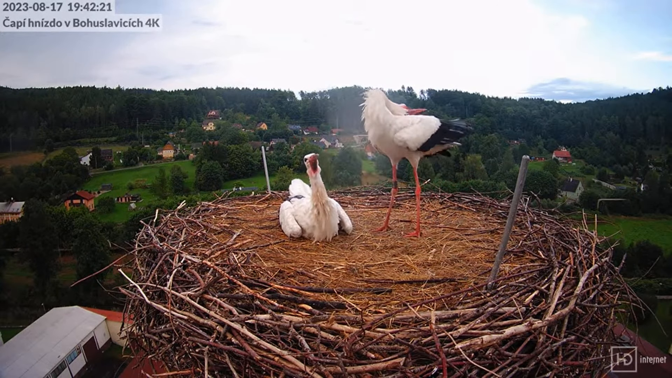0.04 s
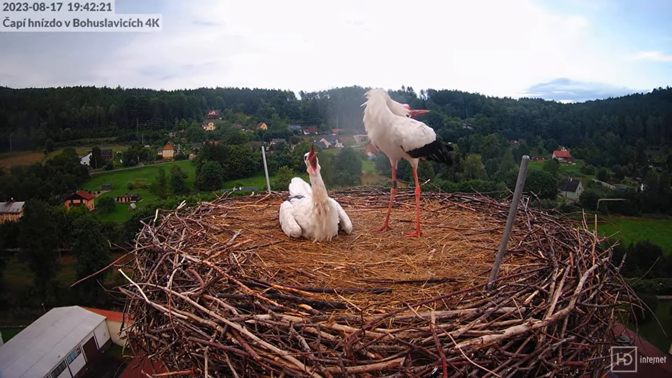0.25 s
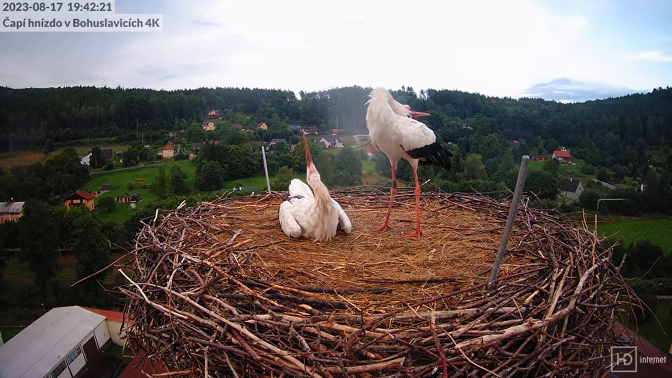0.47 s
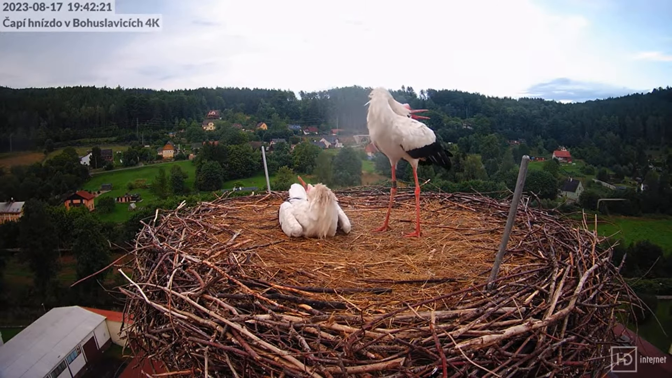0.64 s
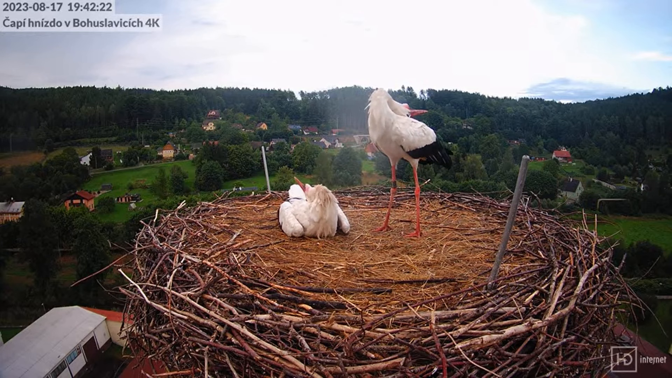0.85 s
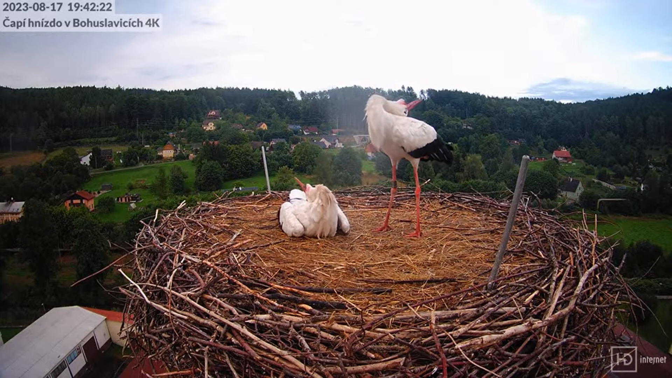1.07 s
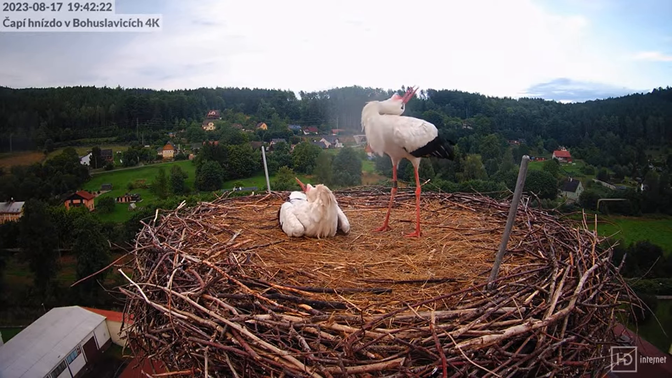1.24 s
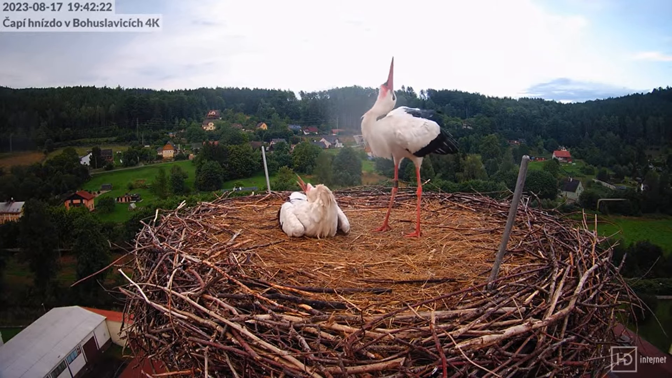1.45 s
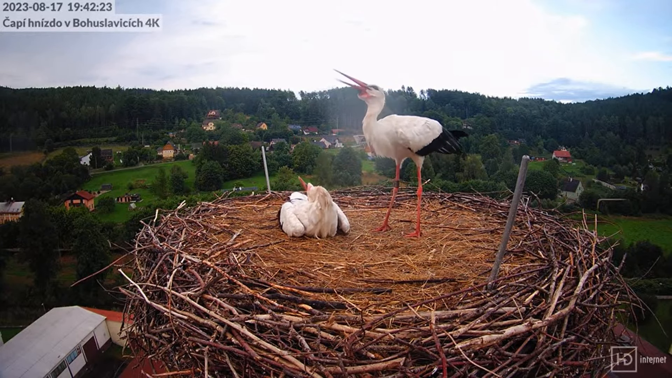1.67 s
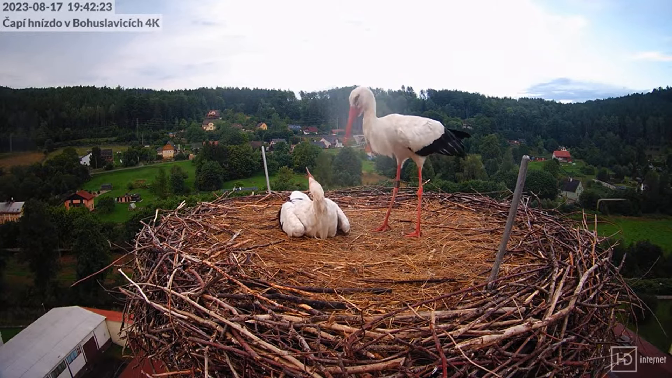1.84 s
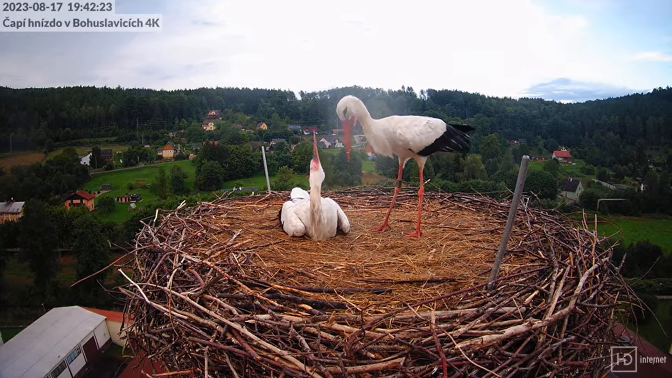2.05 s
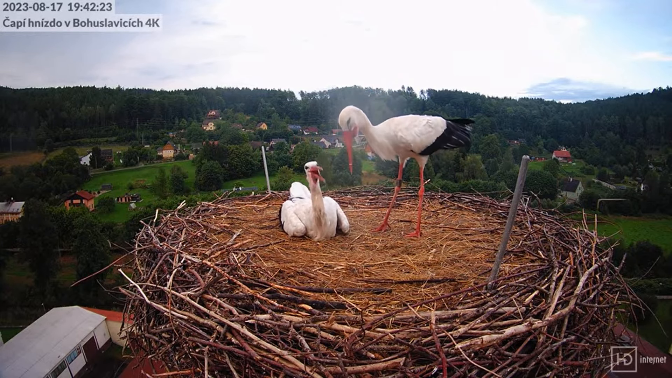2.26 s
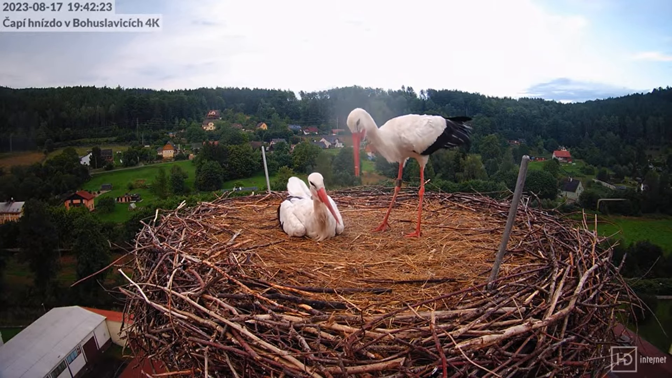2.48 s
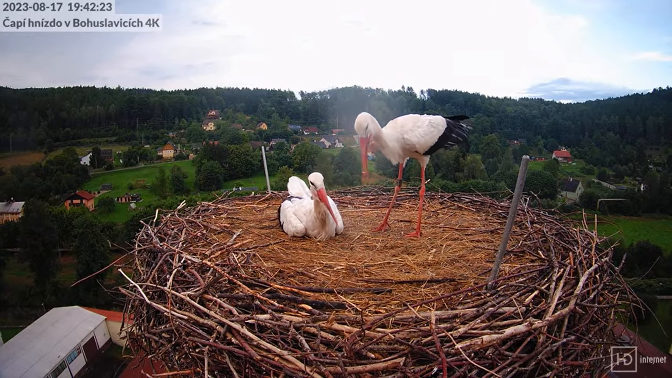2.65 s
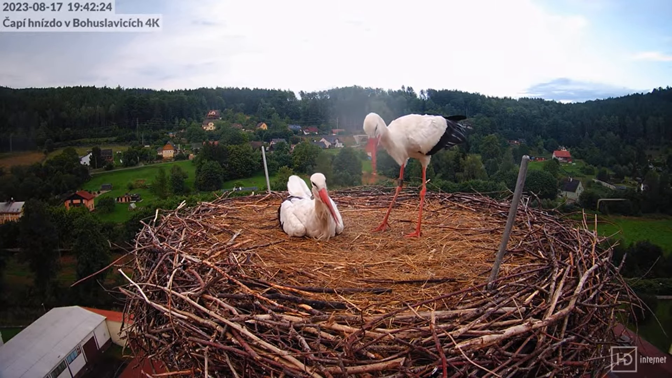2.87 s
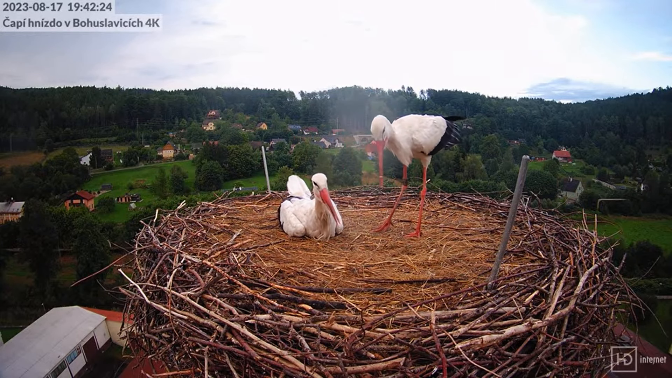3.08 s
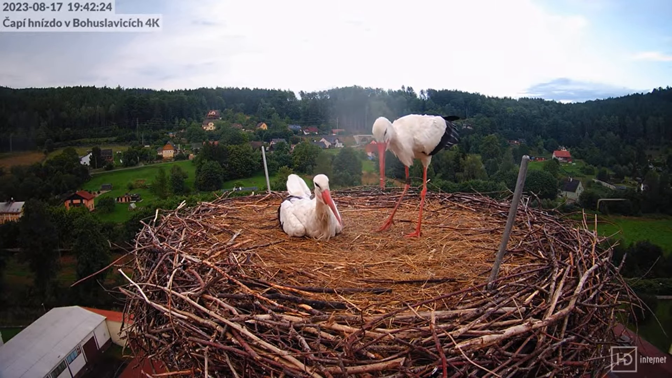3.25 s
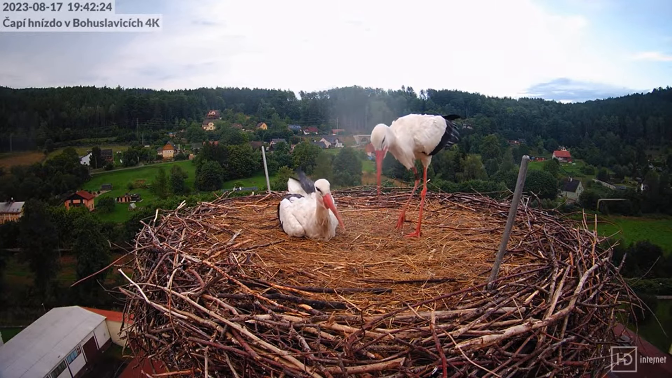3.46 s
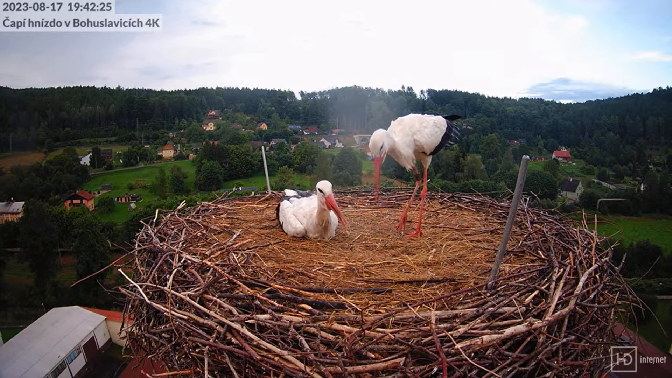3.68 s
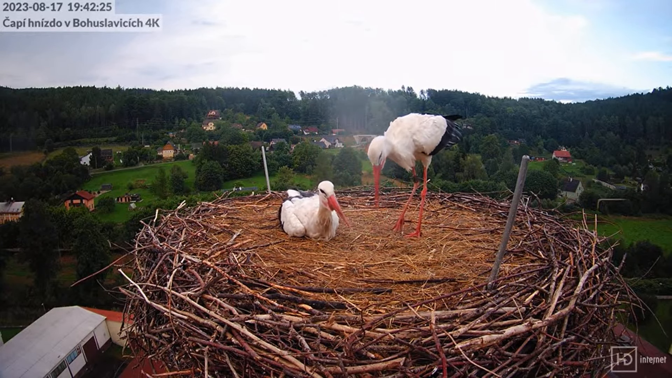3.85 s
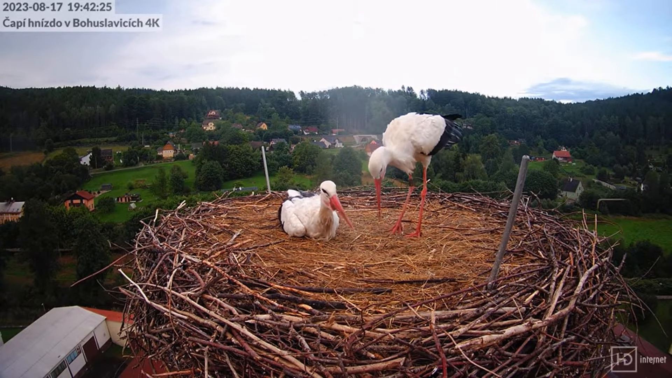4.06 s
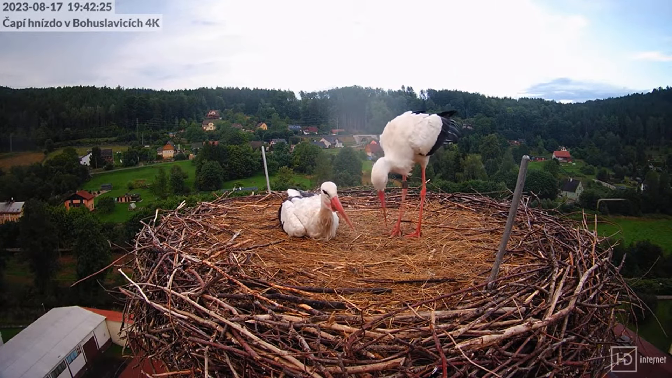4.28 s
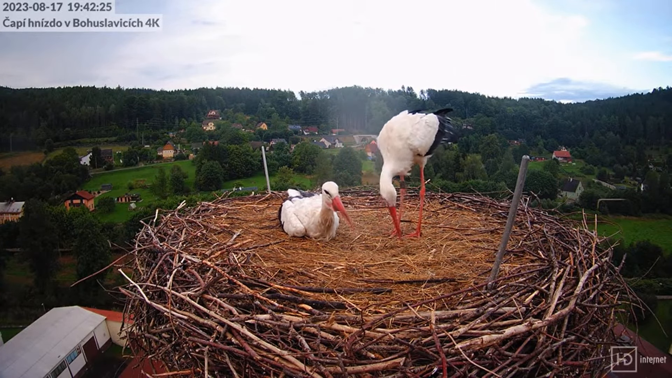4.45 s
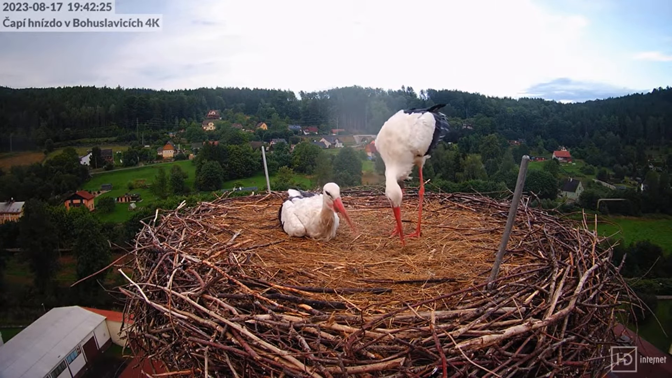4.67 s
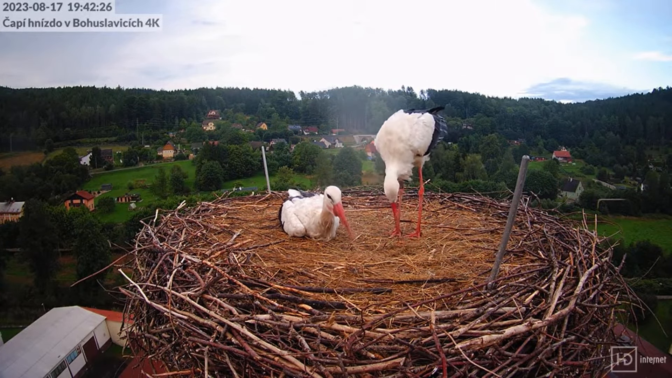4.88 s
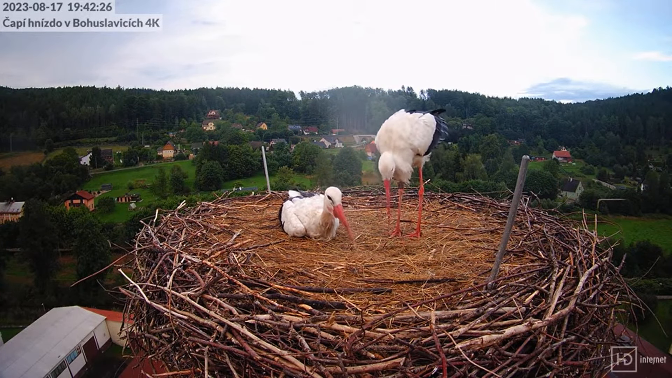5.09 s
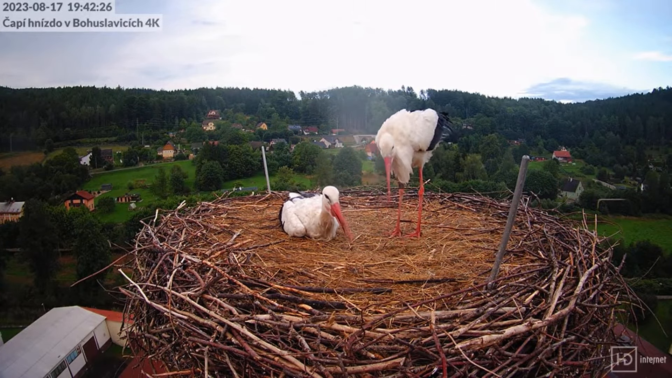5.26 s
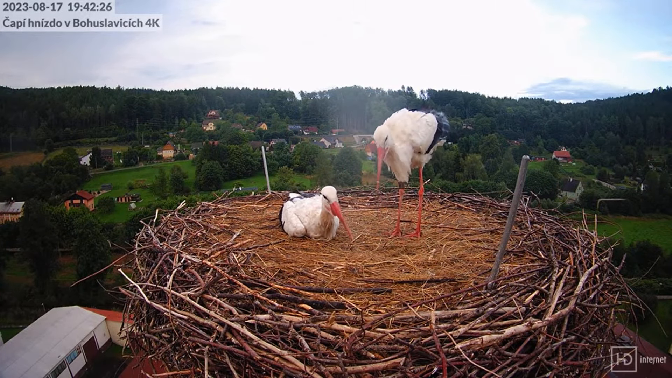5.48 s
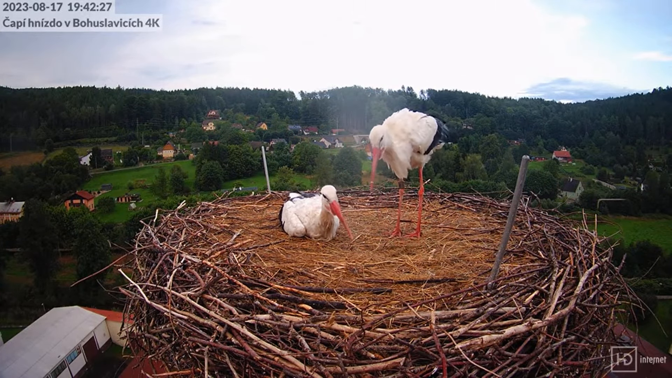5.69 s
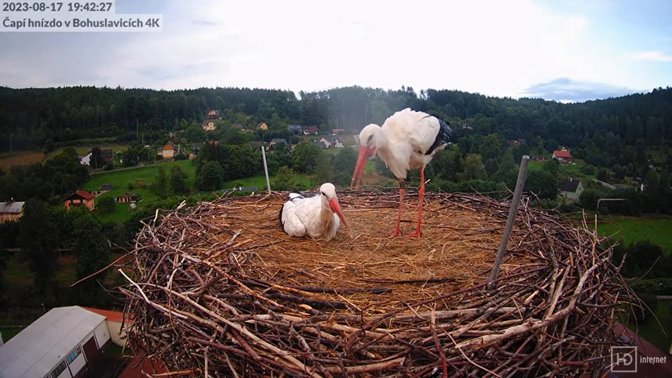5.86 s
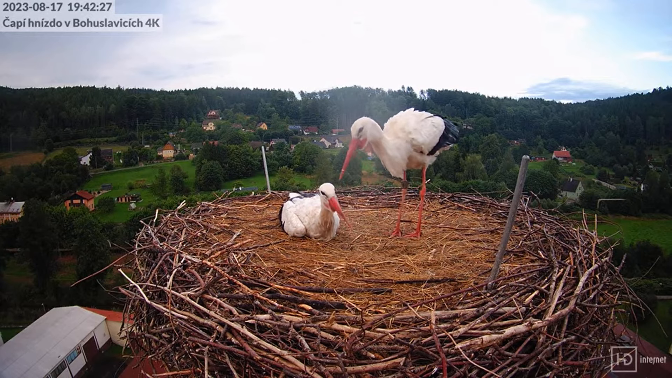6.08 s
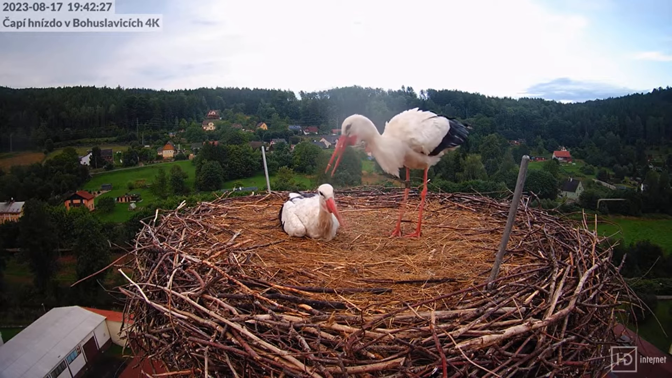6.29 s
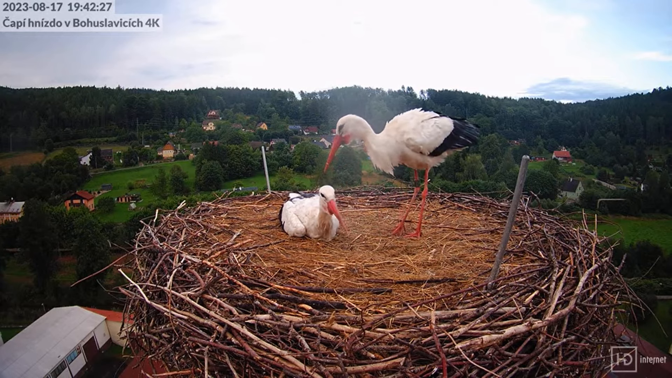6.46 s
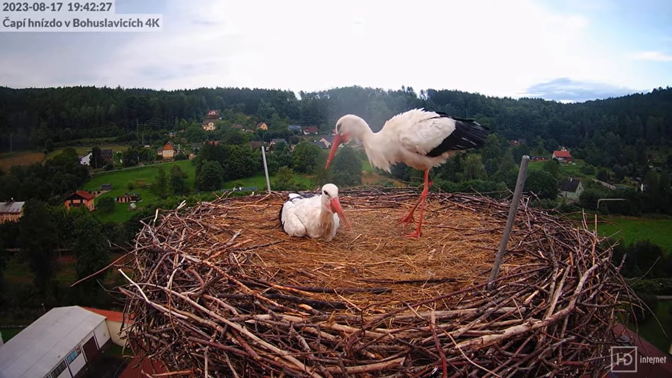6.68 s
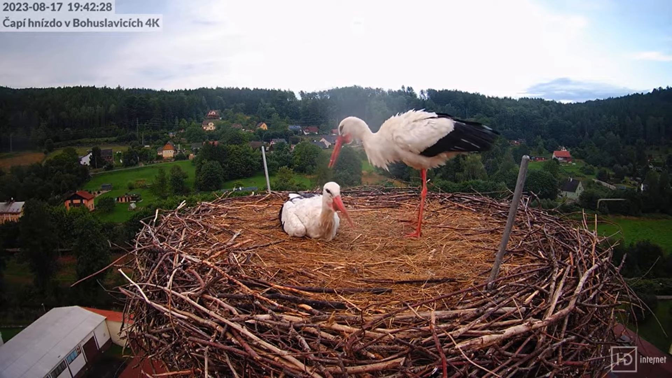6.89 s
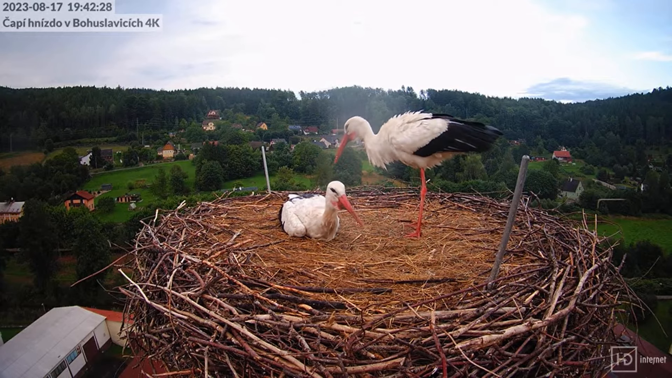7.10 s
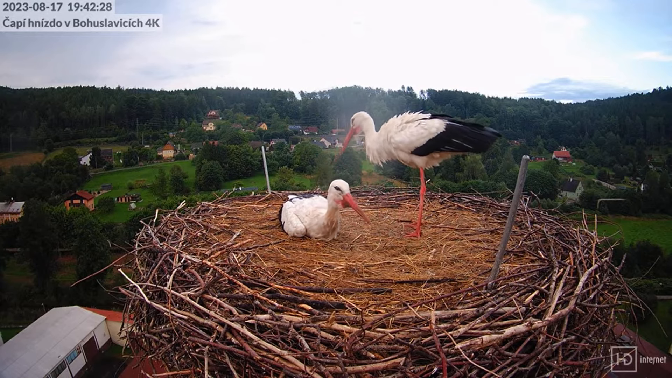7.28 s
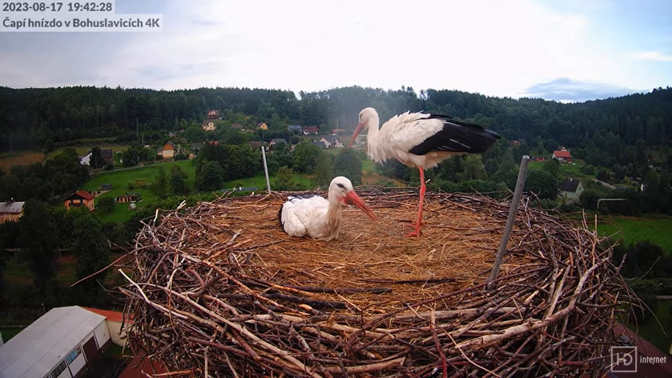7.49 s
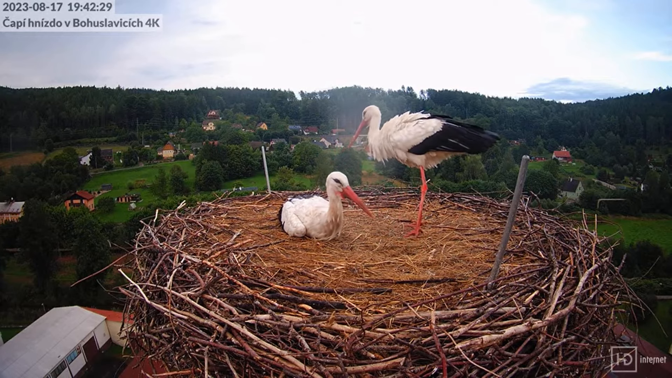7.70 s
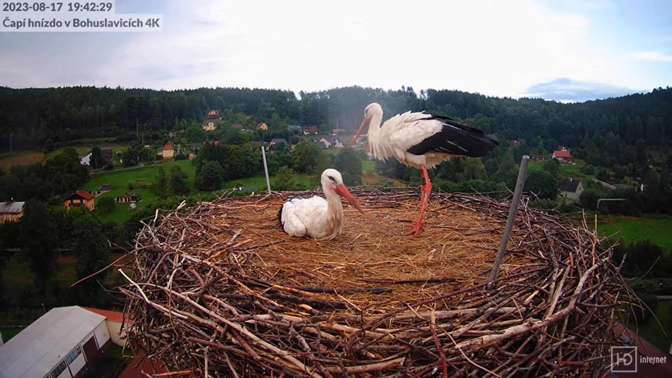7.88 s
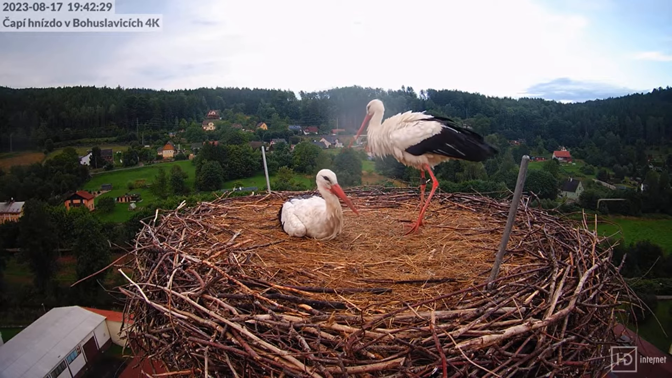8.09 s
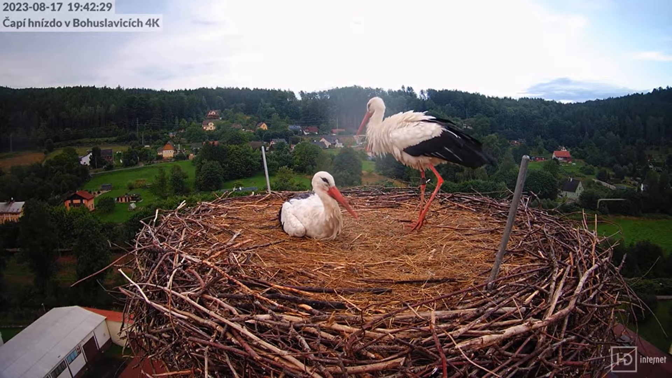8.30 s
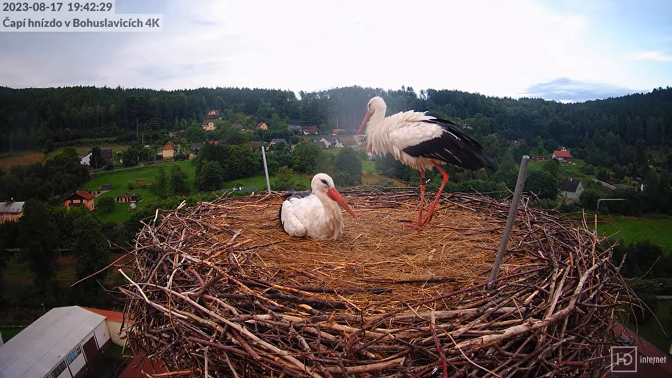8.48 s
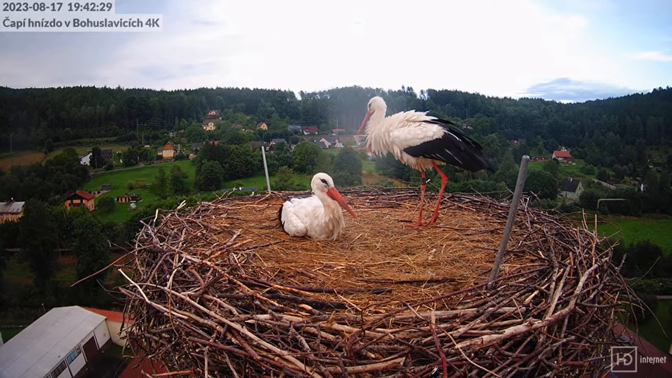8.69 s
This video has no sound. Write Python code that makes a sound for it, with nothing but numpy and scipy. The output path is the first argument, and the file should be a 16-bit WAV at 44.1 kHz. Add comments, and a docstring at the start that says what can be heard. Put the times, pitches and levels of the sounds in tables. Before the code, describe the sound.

Close, dry bill-clapping by a pair of storks in open country: one steady run of about nine to twelve claps a second, and a slower one at about seven. The clatter swells within a second, its pitch shifting as heads move, with slight twig scatter and very faint distant echo. After seven seconds it weakens and stops, leaving only quiet air.

```python
"""Two storks clatter their bills on a high nest, weakly at first, then hard enough to overload the input.
Each clap rings damped bill modes whose pitch moves with the head; nest floor, twigs and far echoes answer.
From 0.4 to 6.1 s a low tone with its octave glides under them; shaped noise makes a swelling hiss, with
hoarse puffs near 2.1 and 5.1 s. The slower mate pauses between 4.2 and 5.2 s. The clatter dies away by
7.6 s, the hiss by 7.75 s, and the faint noise of country air, present throughout, is left."""
import sys
import numpy as np
from scipy import signal
from scipy.fft import rfft, irfft, next_fast_len
from scipy.io import wavfile
from scipy.ndimage import map_coordinates

SR = 44100
rng = np.random.default_rng(int(sys.argv[2]) if len(sys.argv) > 2 else 0)


def generate_wav(sig):
    """Save sig (samples, or channels by samples) to the path in sys.argv[1] as 16-bit PCM at SR."""
    pcm = np.round(np.clip(np.atleast_2d(sig).T, -1, 1) * 32767).astype(np.int16)
    wavfile.write(sys.argv[1], SR, pcm)


N = 385428

# Polarity of each mode, in or out of step as it leaves the bill: sign [+1 or -1]
MODE_SIGNS = [1, 1, -1, 1, 1, 1, 1, -1, 1, -1, 1, -1]


def amp(db):
    """Decibel law: the amplitude gain of a level in dB."""
    return 10 ** (np.asarray(db) / 20)


def along(points, hz):
    """Logarithmic frequency scale: interpolates (Hz, value) points on it."""
    f, v = np.transpose(points)
    return np.interp(np.log(hz + 1), np.log(f + 1), v)


def curves(rows, at):
    """Linear interpolation: each column after the time, read at the given moments."""
    s, *columns = np.transpose(rows)
    return [np.interp(at, s, column) for column in columns]


def wobble(rate):
    """Band-limited fluctuation: a smooth curve through random knots, rate of them a second."""
    knots = rng.standard_normal(int(N * rate / SR) + 4)
    return map_coordinates(knots, [np.arange(N) * rate / SR])


def filtered(x, response):
    """Linear filtering: the spectrum of x is multiplied by a response of frequency."""
    m = next_fast_len(N + SR // 2)
    hz = np.fft.rfftfreq(m, 1 / SR)
    return irfft(rfft(x, m) * response(hz), m)[..., :N]


def noise(colour):
    """Spectral shaping: white noise takes the given colour and is scaled to rms 1."""
    x = filtered(rng.standard_normal(N), lambda hz: amp(along(colour, hz)))
    return x / np.std(x)


def ring(t, modes, contact_s):
    """Modal decay: damped waves that build up while the two halves of the bill are in contact."""
    after = np.maximum(t, 0)
    rise = np.sin(np.pi / 2 * np.clip(t / contact_s, 0, 1)) ** 2
    waves = np.zeros(len(t))
    for sign, (hz, db, t60) in zip(MODE_SIGNS, modes):
        decay = amp(db - 60 * after / t60)
        waves += sign * decay * np.cos(2 * np.pi * hz * after)
    return rise * waves


def clatter(claps, head, poses, bill, horn):
    """Impact excitation and reflection: each clap rings the bill, heard straight and off the nest floor."""
    base_contact_s, softening = 0.00018, 0.47  # for a 0 dB clap; dB longer for each dB weaker
    crack_fade = 0.52  # extra dB lost by the stiff modes for each dB a clap is under 0 dB
    out, span = np.zeros(N + SR), np.arange(SR // 16)
    chance = rng.standard_normal((len(claps), 2, len(MODE_SIGNS)))
    for (s, db), (louder, higher) in zip(claps, chance):
        pose, throat_hz, straight_db, bounce_db, treble_db = curves(head, s)
        # the head moves smoothly between its poses
        *shape, lasting, delay_ms = [np.interp(pose, range(len(poses)), c) for c in np.transpose(poses)]
        bill_hz, resonance_db = shape[:4], shape[4:]

        # a weaker blow excites the stiff modes less; treble_db spares the first of the list
        crack_db = crack_fade * min(db, 0)
        aim_db = resonance_db + [crack_db] + [crack_db + treble_db] * (len(horn) - 1)
        soft_modes = [(hz, level, t60 * lasting)
                      for hz, (level, t60) in zip([throat_hz] + bill_hz, bill)]

        # small random scatter of mode pitch and level for each clap
        drift = 1 + 0.011 * higher
        uneven_db = 1.6 * louder
        modes = [(hz * h, level + a + v, t60)
                 for (hz, level, t60), a, v, h in zip(soft_modes + horn, aim_db, uneven_db, drift)]

        contact_s = base_contact_s * min(amp(-softening * db), 4.5)
        start = int(s * SR)
        t = (start + span) / SR - s
        straight = amp(straight_db) * ring(t, modes, contact_s)
        bounce = amp(bounce_db) * ring(t - delay_ms / 1000, modes, contact_s)
        out[start:][:len(t)] += amp(db) * (straight + bounce)
    return out[:N]


def radiated(x, low_hz, high_hz):
    """Radiation and contact limits: a thin bill sends out no bass, and soft horn little highest treble."""
    x = signal.sosfilt(signal.butter(3, low_hz, "high", fs=SR, output="sos"), x)
    return signal.sosfilt(signal.butter(4, high_hz, fs=SR, output="sos"), x)


def steady_stork():
    """Struck resonator: the steady bird's bill, retuned by the pose of its head."""
    # claps: start_s [s], level_db [dB, before modes and paths]
    claps = [(0.0613, -17.7), (0.177, -6.5), (0.2882, -2.5), (0.3825, -3), (0.4684, -0.9), (0.5578, -1),
             (0.6378, 3.5), (0.7209, 3), (0.8095, 5), (0.8954, 5.5), (0.9808, 7.5), (1.0647, 6.5),
             (1.1511, 9), (1.2382, 9.5), (1.3257, 8), (1.4146, 6.5), (1.506, 6), (1.6011, 2), (1.6981, 5.5),
             (1.7988, -1.5), (1.9014, -1.5), (2.009, 5.5), (2.1201, 10.5), (2.2313, 8), (2.3439, 1.7),
             (2.4573, 3.5), (2.5717, 4), (2.686, 3), (2.8005, 6.1), (2.9149, 5), (3.0293, 2.5), (3.1442, 0),
             (3.2602, 0.5), (3.3777, 3), (3.4927, 0.6), (3.6075, 0), (3.7236, 2.5), (3.84, 2),
             (3.9574, 1.5), (4.0732, 1.6), (4.1879, 1.65), (4.3043, 3.5), (4.4195, 3), (4.5349, 5.5),
             (4.6529, 5), (4.7686, 1.5), (4.8844, 1.2), (5.0017, 1.9), (5.1171, 7), (5.2233, 5),
             (5.3391, 5.5), (5.4627, 0.9), (5.581, 7.5), (5.6978, 4), (5.8152, 3), (5.9327, 2.5),
             (6.0508, 0.6), (6.165, -0.5), (6.2808, 5), (6.3964, 5), (6.5116, 4.5), (6.6263, 3),
             (6.7395, 3.5), (6.8553, 2), (6.9684, 1), (7.0826, -0.7), (7.1982, -2), (7.3169, -7.5),
             (7.4221, -8.5), (7.5388, -40)]
    # head movement: time_s [s], pose [0 back, 1 forward, 2 up], throat_hz [Hz], straight_db [dB],
    # bounce_db [dB], treble_db [dB]
    head = [(.06, 0.0059, 713, -2.5, 19.5, -2.5), (.29, .02, 740, 2, -3, 2.5),
            (.5, 0.44, 850, -10, 0, -25.5), (.72, 0.1, 808, -2, -19, -3.5), (1.2, .01, 818, -7, -28.5, -2),
            (1.9, 0.24, 907, 1, -28.5, -0.5), (2.23, 0.48, 850, -15, -5, -2.2),
            (2.35, 1.23, 782, -11.5, 1, 0.4), (2.57, 1.8, 740, -8, -4.5, 3.7),
            (2.8, 0.85, 747, -15, -7, -0.4), (3.5, 1.1, 748, -8, 2, 2), (4.5, 1.05, 748, -15.5, -1.5, 0),
            (5.2, 1.11, 747, -13.5, 1.5, -2), (5.898, 1.07, 728, -12.5, -1.37, -2.5),
            (6.75, 0.92, 775, -16.5, -2.63, -10), (7.101, .8, 748, -13, 0.1, -17.5),
            (7.45, 1.15, 717, -11.5, 1, -20)]
    # poses back, forward, up: four bill_hz [Hz], throat_db [dB], four bill_db [dB],
    # ring_time_factor [ratio], bounce_delay_ms [ms]
    poses = [(1678, 2400, 3060, 3580, -.5, 0, .6, -2, 1.5, 0.85, 1.3),
             (1899, 2649, 3215, 4000, -1.5, -1.64, .3, 0.86, -.4, 0.98, 1.222),
             (2180, 2940, 3346, 5800, 3, 2, 3, .3, .3, 0.83, 1.1)]
    # throat, then four bill resonances: level_db [dB, before pose], t60_s [s, before ring_time_factor]
    bill = [(-14.5, 0.019), (-3.5, 0.012), (-1.5, 0.0085), (-4.5, 0.0092), (-14, 0.0061)]
    # stiff modes: pitch_hz [Hz, before drift], level_db [dB, before crack and treble], t60_s [s]
    horn = [(2400, -1.5, 0.0014), (4340, -23, .008), (5050, -30.5, 0.015), (5575, -18, 0.012),
            (7100, -32, 0.0017), (7000, -18.5, 0.0072), (8970, -28.5, 0.0033)]
    return radiated(clatter(claps, head, poses, bill, horn), low_hz=472, high_hz=8500)


def slower_mate():
    """Struck resonator: the slower mate's bill, with modes and movements of its own."""
    # claps: start_s [s], level_db [dB, before modes and paths]
    claps = [(0.0501, -15), (0.1577, -12.5), (0.2685, -8.5), (0.3769, -6.5), (0.4854, -6), (0.5963, -4.5),
             (0.7093, -2), (0.8219, -3), (0.941, -4), (1.0589, -3.5), (1.1826, -10.5), (1.3104, -11.5),
             (1.441, -17.5), (1.5783, -11), (1.7153, -8.5), (1.8575, -2), (2.0, 3.3), (2.1443, -2),
             (2.2878, 2), (2.4317, -5.5), (2.5725, -13), (2.7171, -1), (2.8657, 1.5), (3.0122, -2),
             (3.1597, -3.5), (3.3056, -6), (3.4524, -4.5), (3.6028, -4.5), (3.7537, -5.5), (3.9011, -2),
             (4.056, -4.5), (4.2146, -10), (5.1573, -19), (5.3108, -5), (5.4628, -3), (5.6122, -5.5),
             (5.761, -3), (5.9118, -4.5), (6.0629, -8.5), (6.2074, -8), (6.3559, -10), (6.5015, -9),
             (6.6497, -11.5), (6.7946, -13), (6.938, -17), (7.2235, -48)]
    # head movement: time_s [s], pose [0 back, 1 forward, 2 up], throat_hz [Hz], straight_db [dB],
    # bounce_db [dB], treble_db [dB]
    head = [(.05, .05, 920, -4.5, -5.5, 10.5), (.9, 0.0089, 1005, -7, -20.5, 10),
            (1.44, 0.34, 1042, 9, 7, 12.5), (1.72, 2, 980, 1.5, -14.5, 2),
            (2.15, 2.1, 912, -18.5, -9, -0.1), (2.701, 1.15, 828, -21, -11.5, -8.5),
            (3.45, .98, 794.5, -5.5, -1.5, -0.2), (4.2, .95, 830, -15, -8.5, -9.5),
            (5.151, 1.3, 814, -23, 1.6, 4.5), (6.4, .85, 823, -9, -3.5, 0.5),
            (7.2, 0.42, 778, -16, -10, -1.5)]
    # poses back, forward, up: four bill_hz [Hz], throat_db [dB], four bill_db [dB],
    # ring_time_factor [ratio], bounce_delay_ms [ms]
    poses = [(1734, 2850, 3430, 1600, .3, .3, -.6, -5.5, -1.5, 0.82, 1.1),
             (2017, 2930, 3550, 11000, -.6, 1.3, .3, -3, -1.5, 0.69, 1.086),
             (2320, 3250, 4150, 4600, 1.1, 1.8, -.4, -6, -2.5, 0.81, 1.1)]
    # throat, then four bill resonances: level_db [dB, before pose], t60_s [s, before ring_time_factor]
    bill = [(-7, 0.018), (3.5, 0.012), (-2.5, 0.026), (2, 0.014), (-8, 0.0039)]
    # stiff modes: pitch_hz [Hz, before drift], level_db [dB, before crack and treble], t60_s [s]
    horn = [(2630, -5, 0.0012), (4620, -13.5, 0.0093), (5440, -25, 0.012), (6000, -16.5, 0.014),
            (6680, -27.5, 0.017), (8400, -23.5, 0.0066), (8100, -28.5, 0.005)]
    return radiated(clatter(claps, head, poses, bill, horn), low_hz=500, high_hz=7400)


def tail(seconds, decays):
    """Diffuse decay: noise of energy 1 whose frequencies die at their own speeds."""
    hz, t, z = signal.stft(rng.standard_normal(int(seconds * SR)), SR, nperseg=128)
    t60 = along(decays, hz)[:, None]
    x = signal.istft(z * amp(-60 * t / t60), SR, nperseg=128)[1]
    return x / np.linalg.norm(x)


def surroundings(x):
    """Scattering and late echo: twigs smear the clatter at once; roofs and trees below answer later."""
    # decay among the twigs: frequency_hz [Hz], t60_s [s]
    twig_decay = [(500, 0.053), (2500, 0.027), (7000, .05)]
    # decay of the echo from roofs and trees: frequency_hz [Hz], t60_s [s]
    far_decay = [(500, 0.54), (2000, 0.59), (3200, 0.33), (6000, 0.2)]
    twig_db, far_db = -19.5, -48.5
    out, piece = np.zeros(N + 2 * SR), SR // 16
    # every sixteenth of a second scatters a little differently
    for i in range(0, N, piece):
        twigs = np.pad(tail(0.12, twig_decay), (90, 0))  # 90 samples: 2 ms
        wet = signal.fftconvolve(x[i:i + piece], twigs)
        out[i:i + len(wet)] += amp(twig_db + 2.5 * rng.standard_normal()) * wet
    echo = np.pad(tail(0.8, far_decay), (1500, 0))  # 1500 samples: 34 ms
    far = signal.fftconvolve(x, echo)
    return out[:N] + amp(far_db) * far[:N]


def hum():
    """Harmonic tone with modulation: a gliding low tone and its octave, unsteady in pitch and strength."""
    # glide: time_s [s], pitch_hz [Hz, before waver], fundamental_db [dB rms], octave_db [dB rms],
    # both levels before wobble and fade
    glide = [(.4, 123.4, -83.5, -103), (.8, 129.8, -63.5, -68), (1.55, 137, -62, -76),
             (1.8, 140.9, -67, -70.5), (2.3, 149, -62, -67.5), (2.599, 151, -68.5, -83.5),
             (3.15, 158, -79, -73), (3.45, 159.2, -60, -60.5), (4.1, 160.9, -66, -64.5),
             (5.0, 178, -63.5, -61), (5.399, 171.5, -65.5, -56.5), (5.599, 166.4, -56.5, -57),
             (5.85, 158, -63.5, -61), (6.1, 166, -72, -80)]
    t = np.arange(N) / SR
    hz, low_db, octave_db = curves(glide, t)
    waver = 0.018 * wobble(20)
    phase = 2 * np.pi * np.cumsum(hz * (1 + waver)) / SR
    low = amp(low_db + 0.98 * wobble(13)) * np.sin(phase)
    octave = amp(octave_db + 1.4 * wobble(8.7)) * np.sin(2 * phase)
    fade = np.clip(np.minimum(t - glide[0][0], glide[-1][0] - t) / 0.48, 0, 1)
    return np.sqrt(2) * fade * (low + octave)  # root 2 gives each sine rms 1


def hiss():
    """Amplitude-modulated noise: a lower and a higher band of noise rise and fall."""
    # swells: time_s [s], lower_db [dB rms], higher_db [dB rms], before wobble and fade
    swells = [(0, -62, -69), (.45, -57, -61.5), (.75, -54, -58), (1.6, -53, -63), (2.27, -57, -56),
              (2.55, -60, -75.5), (3.11, -65.5, -67.5), (3.35, -57.5, -68), (3.75, -56.5, -59),
              (4.05, -61.5, -82), (4.4, -58.5, -79.5), (4.89, -59.5, -63.5), (5.17, -50, -61.5),
              (5.4, -57, -61), (5.75, -55.5, -68.5), (5.95, -61.5, -64.5), (7.45, -62, -64.5),
              (7.62, -71, -73)]
    # lower spectrum: frequency_hz [Hz], density_db [dB per Hz, relative]
    lower_colour = [(30, -24), (200, -5), (500, 3), (900, 3), (1500, -3), (4000, -28.5), (7000, -26.5),
                    (12000, -60)]
    # higher spectrum: frequency_hz [Hz], density_db [dB per Hz, relative]
    higher_colour = [(800, -29.5), (1700, -3), (2300, -6), (3000, -9.5), (4500, -15.5), (7000, -32),
                     (12000, -56.5)]
    end_s, fade_s = 7.75, 0.25
    t = np.arange(N) / SR
    lower_db, higher_db = curves(swells, t)
    lower = amp(lower_db + 0.95 * wobble(10)) * noise(lower_colour)
    higher = amp(higher_db + 1.4 * wobble(21)) * noise(higher_colour)
    return (lower + higher) * np.clip((end_s - t) / fade_s, 0, 1)


def puffs():
    """Enveloped noise: brief parabolic swells of a hoarse spectrum."""
    # puffs: centre_s [s], half_length_s [s], level_db [dB at the centre]
    swells = [(2.08, 0.055, -56.5), (5.082, 0.055, -49)]
    # hoarse spectrum: frequency_hz [Hz], density_db [dB per Hz, relative]
    hoarse_colour = [(400, -31.5), (880, -3.5), (1400, -13), (2100, -2), (2600, .5), (3100, -6),
                     (3800, -13.5), (7000, -28), (12000, -56.5)]
    t = np.arange(N) / SR
    swell = sum(amp(db) * np.clip(1 - ((t - s) / half) ** 2, 0, 1) for s, half, db in swells)
    return swell * noise(hoarse_colour)


def air():
    """Broadband noise: the faint rush of the countryside, wavering slightly in level."""
    # rush spectrum: frequency_hz [Hz], density_db [dB per Hz, relative]
    rush_colour = [(10, -40), (30, -9), (80, -14.5), (160, -13.5), (300, -14), (1100, -12.5), (2100, -20),
                   (3200, -26.5), (4500, -36), (7000, -42.5), (12000, -48), (22000, -59)]
    return amp(-70 + 0.89 * wobble(5.8)) * noise(rush_colour)  # about -70 dB rms


def scene():
    """Superposition: both birds, their surroundings and the quieter layers add up."""
    birds = steady_stork() + slower_mate()
    return (birds + surroundings(birds) + hum() + puffs() + hiss() + air())[None]


def record(dry):
    """Saturation, then band limiting: the input clips the loudest claps before its treble is dulled."""
    # response after the clipping: frequency_hz [Hz], gain_db [dB]
    response = [(20, 5.5), (8800, -2), (10500, -6.5), (13000, -5), (16500, -10)]
    ceiling, top_hz = 0.89, 16700  # amplitude limit before the response; band limit
    clipped = dry / (1 + np.abs(dry / ceiling) ** 14) ** (1 / 14)
    return filtered(clipped, lambda hz: amp(along(response, hz)) * (hz < top_hz))


dry = scene()
out = record(dry)
generate_wav(out)
```